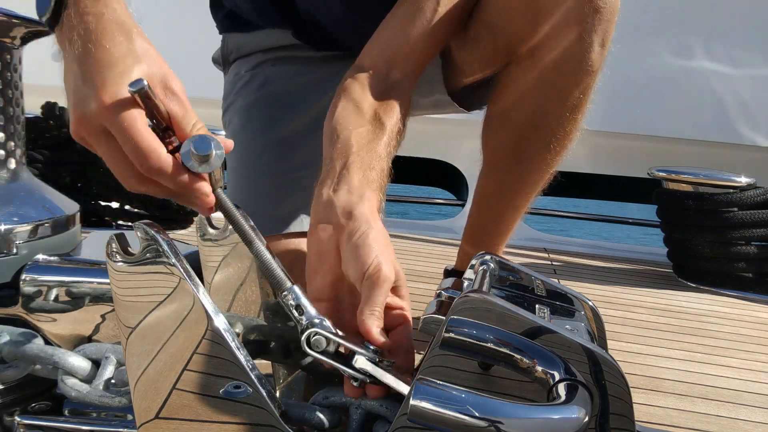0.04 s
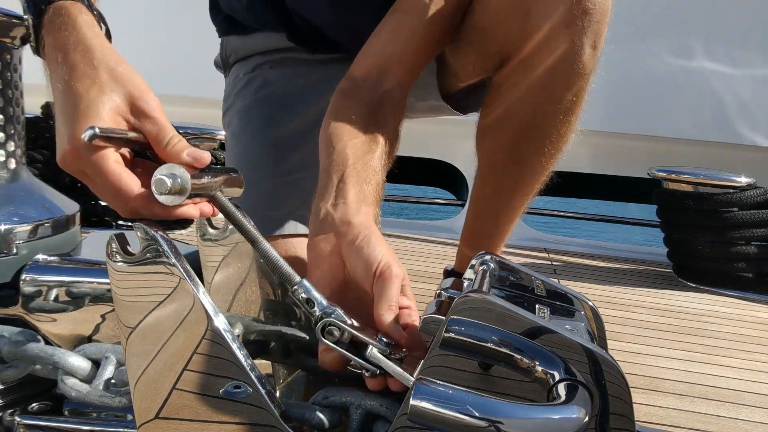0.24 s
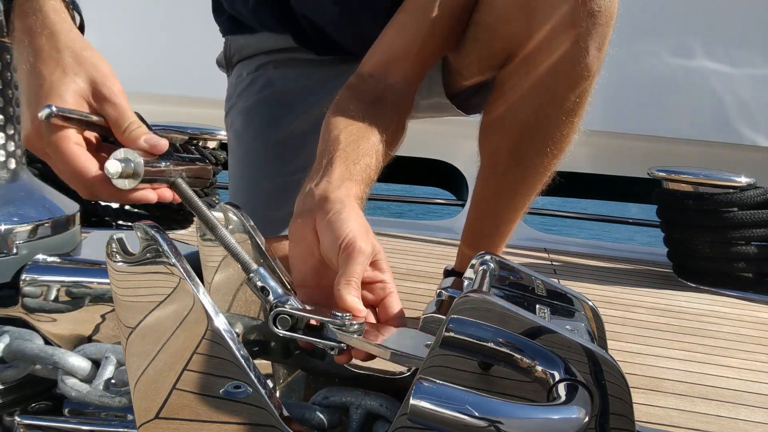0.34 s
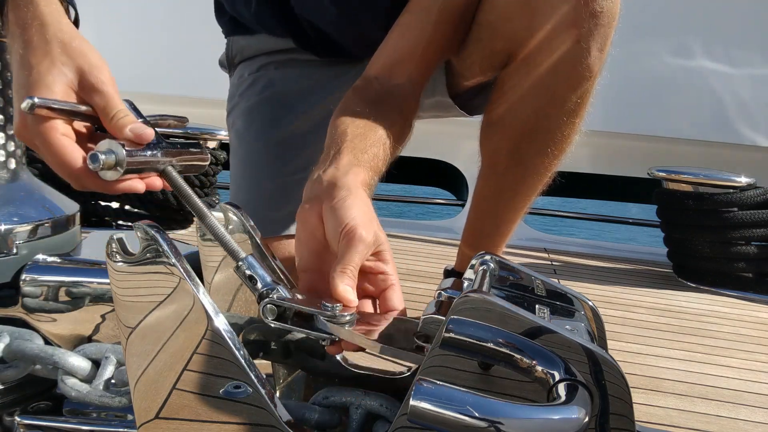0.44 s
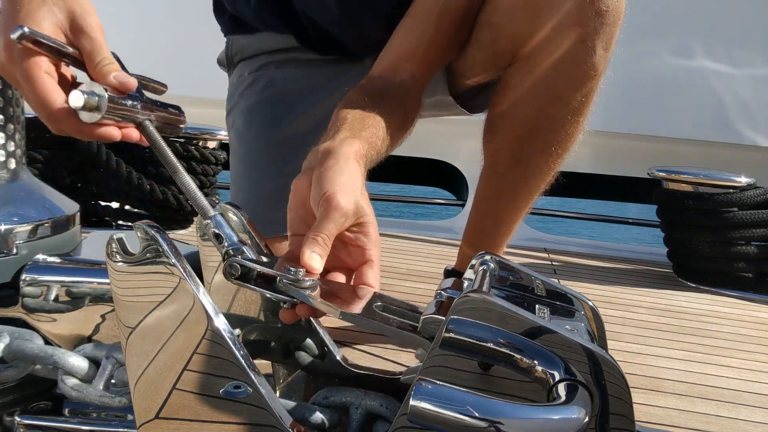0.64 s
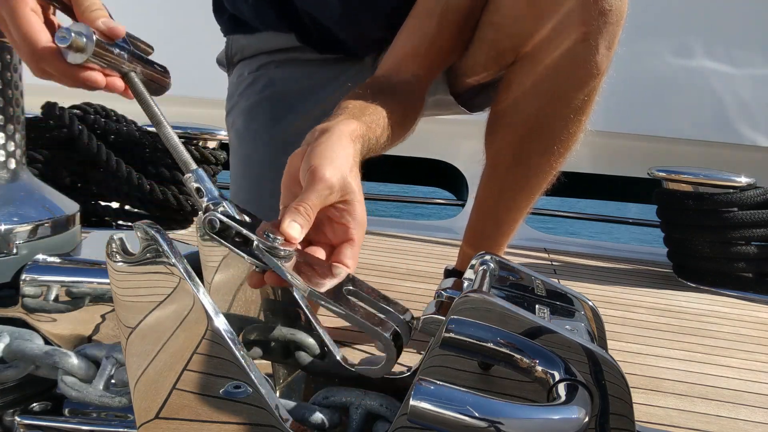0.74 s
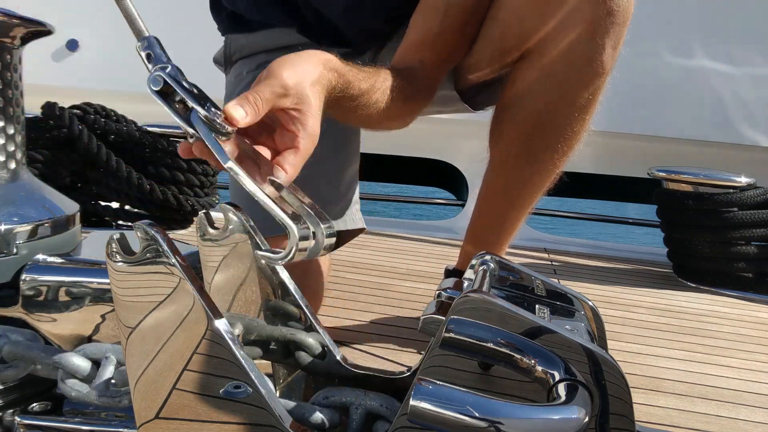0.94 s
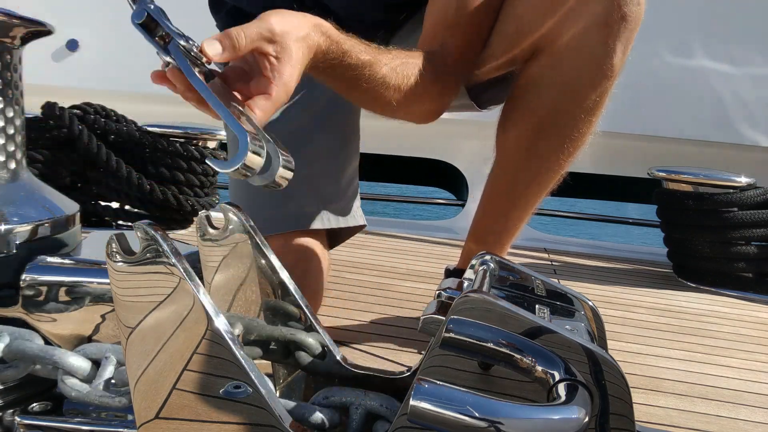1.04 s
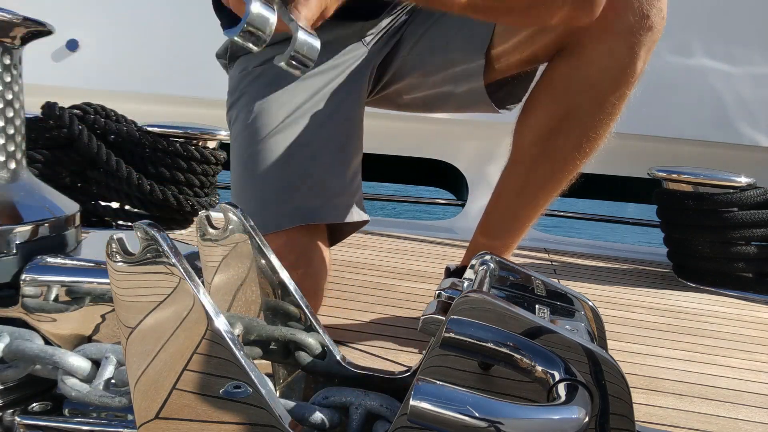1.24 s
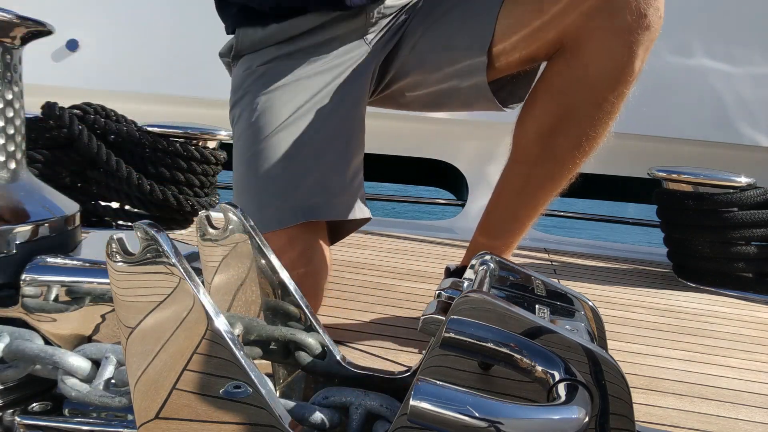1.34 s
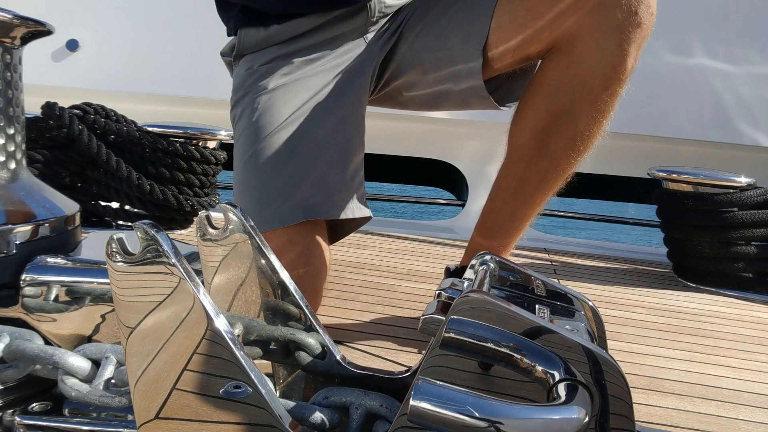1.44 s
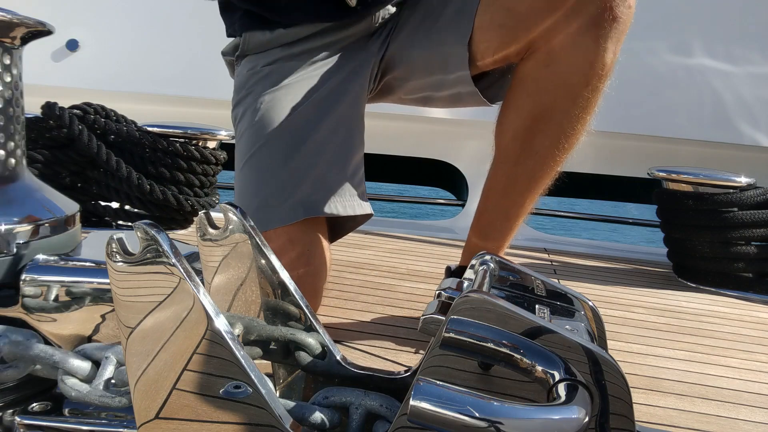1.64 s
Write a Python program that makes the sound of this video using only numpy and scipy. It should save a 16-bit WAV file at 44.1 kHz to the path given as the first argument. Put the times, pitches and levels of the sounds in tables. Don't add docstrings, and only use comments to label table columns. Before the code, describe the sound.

A steel claw is knocked off an anchor chain: faint scraping from 0.15 seconds, a loud bright clank at 0.21 with rapid bounces, then rattling and low chain rumble. A softer link tap follows at 0.5. High ringing is choked quickly, a thin trace lingering to about 1.1. Quiet sea hiss and engine drone remain, with tiny ticks near 1.27 and 1.55-1.7. Close, dry, outdoors on deck.

```python
import sys
import numpy as np
from scipy import signal
from scipy.fft import rfft, irfft
from scipy.io import wavfile
from scipy.ndimage import uniform_filter1d

SR = 44100
rng = np.random.default_rng(int(sys.argv[2]) if len(sys.argv) > 2 else 0)


def master_out(mix):
    frames = np.transpose(np.atleast_2d(mix))
    ceiling = np.clip(frames, -1, 1)
    pcm = np.round(ceiling * 32767).astype(np.int16)
    wavfile.write(sys.argv[1], SR, pcm)


def makeup_ratio(level_db):
    decades = np.asarray(level_db, float) / 20
    return 10 ** decades


N = 74970


def line(table, at):
    return np.interp(at, *np.array(table, float).T)


def coloured(spectrum):
    hz = np.maximum(np.fft.rfftfreq(N, 1 / SR), 1)
    f, db = np.array(spectrum, float).T
    tilt = np.interp(np.log(hz), np.log(f), db, left=-90, right=-70)
    noise = irfft(rfft(rng.standard_normal(N)) * makeup_ratio(tilt), N)
    return noise / noise.std()


def walk(rate_hz):
    hold = int(SR / rate_hz)
    steps = np.repeat(rng.standard_normal(N // hold + 1), hold)
    wander = uniform_filter1d(steps, hold)[:N]
    return wander / wander.std()


def band(x, hz, width_hz):
    return signal.lfilter(*signal.iirpeak(min(hz, .4 * SR), hz / width_hz, SR), x)


def ring(t, start, hz, db, t60, stop=9., phase=0.):
    rise_s, choke_s = .002, .004
    u = np.maximum(t - start, 0)
    onset = 1 - np.exp(-u / rise_s * 3)
    decay = np.exp(-np.log(1000) * u / t60 - np.maximum(t - stop, 0) / choke_s)
    return makeup_ratio(db) * np.sqrt(2) * onset * decay * np.sin(2 * np.pi * hz * u + phase)


def rings(t, modes):
    return sum(ring(t, *mode) for mode in modes)


def struck(t, modes, blows):
    scatter_db = 2.5
    luck = rng.standard_normal((len(blows), len(modes), 2))
    out = np.zeros(N)
    for i, (start, blow_db) in enumerate(blows):
        for k, (hz, mode_db, t60) in enumerate(modes):
            db = blow_db + mode_db + scatter_db * luck[i, k, 0]
            out += ring(t, start, hz, db, t60, phase=3 * luck[i, k, 1])
    return out


def sea(t):
    # (f/Hz, level/dB per Hz)
    sea_colour = [(25, -38), (50, -10.5), (80, -3), (200, -11), (320, -24.5), (800, -33.5), (4100, -36),
                  (15900, -48.5)]
    # (t/s, level/dB)
    swell = [(0, 1.5), (.15, 1.5), (.6, 2), (1.05, 3), (1.12, -2.5), (1.22, 2), (1.3, -1), (1.7, 1)]
    return coloured(sea_colour) * makeup_ratio(-53.5 + line(swell, t) + .7 * walk(10))


def generator():
    drone_hz, width_hz, drone_db = 75, 5.4, -51.5
    drone = band(rng.standard_normal(N), drone_hz, width_hz)
    return drone / drone.std() * makeup_ratio(drone_db)


def contact():
    # (t/s, level/dB, t60/s, centre f/Hz, width/Hz)
    bursts = [(0, -51.5, .12, 694, 1187), (.139, -57, .1, 618, 483), (.1465, -45, .15, 620, 700),
              (0.169, -47, 0.12, 6600, 7860), (.17, -44, .1, 1199, 1434), (.176, -37, .25, 1400, 2000),
              (.188, -38, .15, 2500, 2620), (0.1962, -38, 0.05, 6500, 6360), (.2, -38, .15, 2000, 2500),
              (0.2122, -7, .11, 8800, 10500), (0.223, -21.5, 0.12, 6046, 8950),
              (.246, -32, .05, 6000, 6000), (0.2548, -25, 0.06, 8600, 5000), (0.263, -32, .15, 1187, 1771),
              (.225, -34, .2, 600, 900), (.297, -42, 0.1, 6500, 6000), (0.3755, -42, 0.05, 4600, 3000),
              (.376, -45, .1, 1500, 2500), (0.4015, -41, 0.06, 6500, 6500), (0.403, -31, 0.075, 1207, 2434),
              (0.403, -51, .07, 14100, 2500), (.4065, -40, .07, 3500, 4500), (.419, -45, .08, 1500, 3000),
              (.478, -50, .1, 2200, 2400), (0.486, -47, 0.1, 4800, 3900), (.49, -40, .08, 900, 1500),
              (0.5016, -22, 0.035, 4800, 5000), (.502, -29, 0.11, 1000, 2200),
              (.5155, -39, .06, 4800, 3500), (0.504, -43, .13, 5560, 8070), (0.699, -47, 0.034, 6000, 5530),
              (1.264, -56.5, .04, 5000, 5000), (1.5604, -57, .04, 3000, 2500),
              (1.5748, -52, .018, 5500, 6000), (1.662, -56, .03, 5000, 3500),
              (1.688, -62.5, .03, 7000, 3990)]
    grit_db, rattle_share, treble_damp = -5, .12, .45
    count = 70
    out = np.zeros(N + SR)
    u = np.arange(SR // 5) / SR
    for start, db, t60, hz, width_hz in bursts:
        luck = rng.random((count, 4))
        off = (np.arange(count)[:, None] + luck[:, :1]) / 35 - 1
        f = np.clip(hz + width_hz * off * .7, 120, 15700)
        late = np.maximum(u - luck[:, 1:2] ** 2 * rattle_share * t60, 0)
        life = t60 * np.clip((hz / f) ** treble_damp, .5, 1.3) * (.6 + .5 * luck[:, 2:3])
        gain = makeup_ratio(-10 * luck[:, 3:4] - 16 * off ** 2) * (f > 200)
        modes = gain * np.sin(2 * np.pi * f * late) * np.exp(-np.log(1000) * late / life)
        crowd = modes.sum(axis=0) / 2.77
        rough = rng.standard_normal(len(u)) * makeup_ratio(3 * walk(400)[:len(u)])
        rough = band(band(rough, hz, width_hz * 1.4), hz, width_hz * 1.4)
        grit = rough / rough.std() * np.exp(-np.log(1000) * u / t60)
        fade = np.minimum((u[-1] - u) * 50, 1)
        k = int(start * SR)
        out[k:k + len(u)] += makeup_ratio(db) * (crowd + makeup_ratio(grit_db) * grit) * fade
    return out[:N]


def fittings(t):
    # (start t/s, f/Hz, level/dB, t60/s, choked t/s)
    fitting_modes = [(.012, 452, -45, .7, .115), (.144, 455, -44.5, .6, .2), (.26, 1495, -39, .3, .4),
                     (.522, 1495, -51, .6, .71), (.3, 7241, -45, .3, .42), (.303, 7140, -49, .3, .42),
                     (.3, 6977, -53, .5, .4), (.305, 5690, -61, .6, .37), (.215, 1280, -38, .2, .3),
                     (.402, 1300, -48, .1, .45), (.376, 10150, -59, .15, .4), (.376, 5050, -48, .05, .39),
                     (.505, 905, -51, .4, .64), (.52, 4230, -60, .4, .62), (.36, 905, -52, .8, .49),
                     (.172, 930, -47, .2, .21), (.172, 10450, -58, .5, .198), (.146, 680, -47, .2, .2),
                     (.51, 700, -47, .3, .6), (.196, 5500, -35, .05, .204)]
    return rings(t, fitting_modes)


def chain(t):
    # (t/s, level/dB)
    drag = [(.02, -49), (.12, -62.5), (.145, -50.5), (.22, -37.5), (.31, -38), (.39, -42.5), (.42, -39),
            (.475, -43.5), (.52, -37), (.6, -56), (.75, -63)]
    # (f/Hz, level/dB per Hz)
    drag_colour = [(59, -44), (100, 2), (340, -4), (452, 0.5), (601, -7), (1300, -19.5), (2100, -25),
                   (3000, -27.5), (3900, -45.5), (6600, -120)]
    settling = list(drag) + [(.85, -66.5)]
    return coloured(drag_colour) * makeup_ratio(line(settling, t) + 1.5 * walk(50))


def shank(t):
    # (start t/s, f/Hz, level/dB, t60/s, choked t/s)
    shank_modes = [
        (.175, 3542, -42, .3, .185),
        (.189, 3542, -37, 2, .197),
        (.199, 3542, -31.5, 2, .211),
        (.306, 3540, -39, 1.5, .376),
        (.383, 3540, -46, .5, .394),
        (.486, 3540, -43, 1, .502),
    ]
    return rings(t, shank_modes)


def bounces(t):
    # (start t/s, f/Hz, level/dB, t60/s, choked t/s)
    bounce_modes = [(.2125, 6010, -17, .06, .222), (.2235, 6010, -10.5, .3, .233),
                    (.2225, 2345, -21, .5, .242), (.2135, 12655, -19.5, .5, .226),
                    (.215, 9441, -19, .2, .23), (.214, 10130, -20, .15, .235),
                    (.255, 14900, -42, .15, .275), (.2225, 7877, -19, .2, .23), (.246, 6010, -27, .1, .25),
                    (.2555, 6010, -25, .1, .264), (.2545, 9441, -24, .08, .29),
                    (.2545, 9803, -26, .08, .28), (.257, 10130, -29, .09, .29), (.258, 2345, -35, .15, .29),
                    (.265, 1530, -36, .2, .29), (.201, 7100, -43, .2, .21), (.489, 6000, -50, .1, .497),
                    (.403, 13000, -50, .06, .42), (.403, 14800, -49, .06, .42),
                    (.5035, 5300, -24, .05, .512), (.502, 5750, -29, .04, .51), (.514, 5000, -35, .09, .55),
                    (.514, 5400, -39, .08, .55), (.507, 4226, -31, .1, .53)]
    return rings(t, bounce_modes)


def claw(t):
    # (f/Hz, level/dB, t60/s)
    claw_modes = [(5472, -10, .09), (6073, -8, .07), (7292, -14, .1), (7877, -7, .07), (7965, -9, .07),
                  (9441, -6, .09), (9803, -7, .08), (10163, -8, .09), (14180, -14, .05), (14900, -18, .06),
                  (1550, -12, .05)]
    # (t/s, level/dB)
    blows = [
        (0.2122, -14),
        (.2165, -20),
        (0.2225, -17),
    ]
    return struck(t, claw_modes, blows)


def hook(t):
    # (start t/s, f/Hz, level/dB, t60/s, choked t/s)
    hook_modes = [
        (.2135, 8920, -22.5, .4, .296),
        (.298, 8920, -30.5, 1, .398),
        (.403, 8922, -37, 3, .501),
        (.5025, 8918, -31, .07, .53),
        (.236, 11390, -33.5, .3, .35),
        (.59, 11390, -66, 1, .72),
    ]
    return rings(t, hook_modes)


def gripped(t):
    # (start t/s, f/Hz, level/dB, t60/s, gripped from t/s)
    gripped_modes = [
        (.2135, 3544, -8.8, .4, .256),
        (.503, 11390, -28.5, .27, .548),
    ]
    grip_s = .037
    out = np.zeros(N)
    for *mode, grip_start in gripped_modes:
        held = np.maximum(t - grip_start, 0) / grip_s
        out += ring(t, *mode) * np.exp(-held ** 2)
    return out


def deck(t):
    # (t/s, f/Hz, level/dB, t60/s)
    thuds = [
        (.31, 136, -37, .2),
        (.507, 180.5, -37.5, 0.3),
    ]
    return rings(t, thuds)


def turning(t):
    # (start t/s, f/Hz, level/dB, t60/s, silent t/s)
    turning_modes = [
        (.5018, 8918, -33.5, .9, .561),
        (.522, 3538, -43, 1.6, .885),
    ]
    turn_s, caught_s = (.024, .16), 1.08
    out = np.zeros(N)
    for (*mode, silent), turn in zip(turning_modes, turn_s):
        out += ring(t, *mode, caught_s) * np.tanh((silent - t) / turn)
    return out


def link(t):
    # (f/Hz, level/dB, t60/s)
    link_modes = [(1680, -14, .07), (2972, -12, .06), (3560, -7, .05), (4226, -8, .05), (4700, -7, .04),
                  (4990, -10, .07), (5206, -7, .04), (5700, -7, .03), (6627, -10, .05), (7763, -16, .07),
                  (9528, -16, .07), (10350, -7, .08), (10270, -13, .08), (700, -8, .06)]
    # (t/s, level/dB)
    taps = [
        (.5021, -26),
        (.5052, -29),
        (.509, -35),
        (.5155, -38),
    ]
    return struck(t, link_modes, taps)


def late_ticks(t):
    # (t/s, f/Hz, level/dB, t60/s)
    ticks = [(1.2655, 4100, -47.5, 0.022), (1.265, 2700, -56, .025), (1.266, 1370, -58, .03),
             (1.2648, 5500, -50.5, .028), (1.263, 8100, -60, .04), (1.5424, 8120, -56, .025),
             (1.5604, 5000, -51, .016), (1.5604, 8050, -55.5, .014), (1.5604, 10000, -63.5, .014),
             (1.5757, 3180, -51.5, .045), (1.575, 7000, -58, .012), (1.663, 3280, -56.5, .016)]
    return rings(t, ticks)


def scene():
    t = np.arange(N) / SR
    background = sea(t) + generator()
    chain_and_deck = fittings(t) + chain(t) + deck(t)
    long_rings = shank(t) + hook(t) + gripped(t) + turning(t)
    impacts = contact() + bounces(t) + claw(t) + link(t) + late_ticks(t)
    return (background + chain_and_deck + long_rings + impacts)[None]


def low_pass(x):
    return signal.sosfilt(signal.butter(12, 16850, fs=SR, output="sos"), x)


def record(dry):
    top_hz, limit = 15900, .8
    x = signal.sosfilt(signal.ellip(10, .2, 80, top_hz, fs=SR, output="sos"), dry)
    x = x / (1 + (x / limit) ** 4) ** (1 / 4)
    mix = signal.sosfilt(signal.butter(2, 40, "high", fs=SR, output="sos"), x)
    return low_pass(mix)


dry = scene()
out = record(dry)
master_out(out)
```